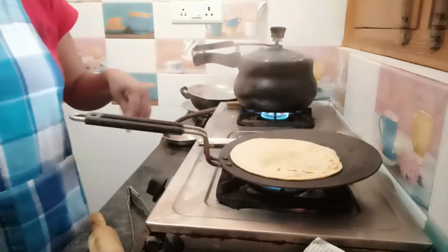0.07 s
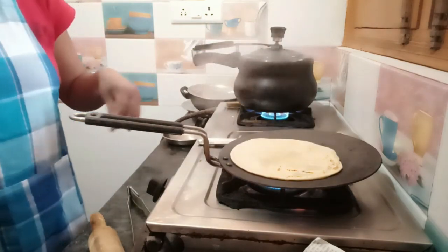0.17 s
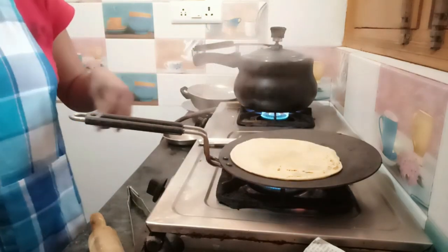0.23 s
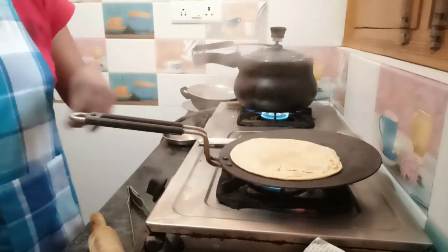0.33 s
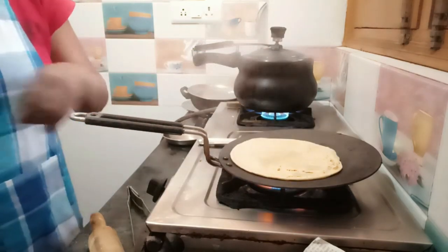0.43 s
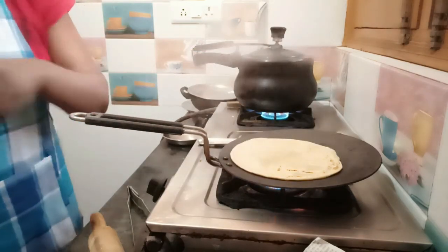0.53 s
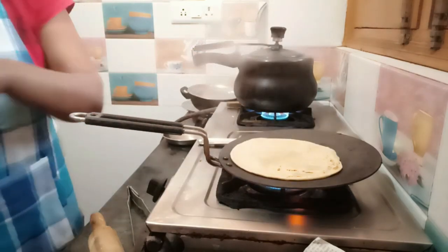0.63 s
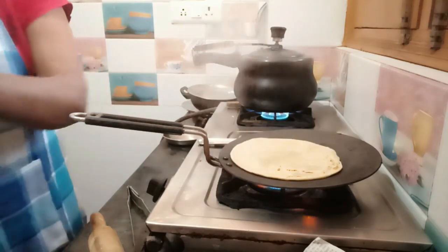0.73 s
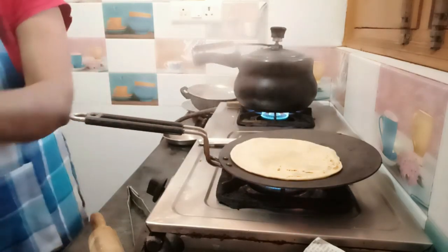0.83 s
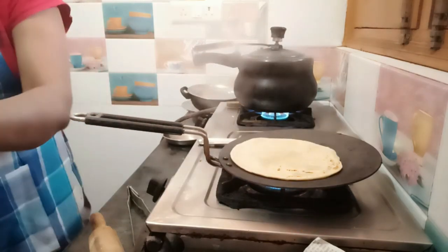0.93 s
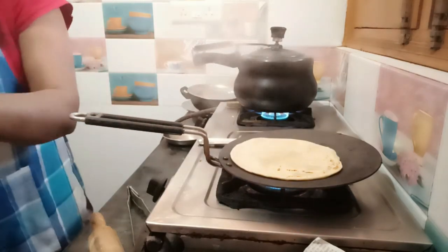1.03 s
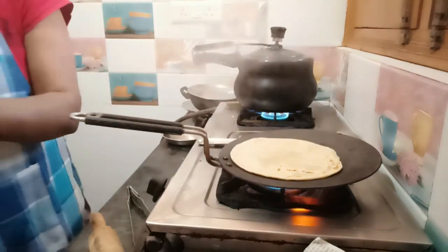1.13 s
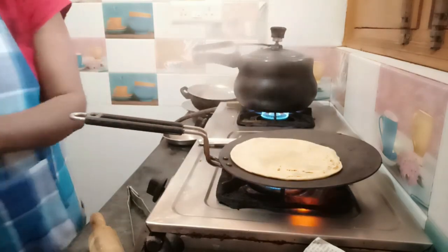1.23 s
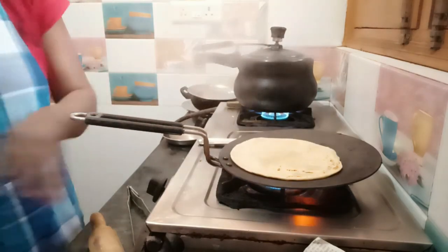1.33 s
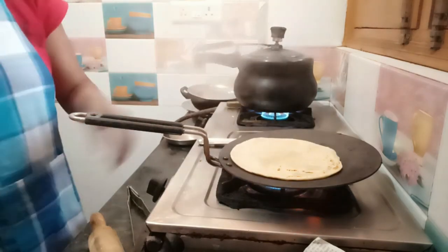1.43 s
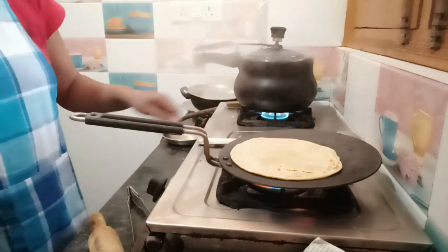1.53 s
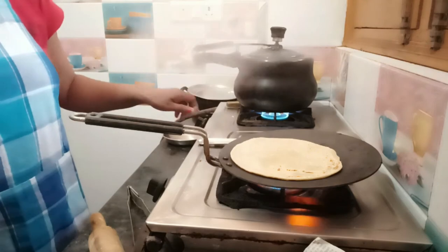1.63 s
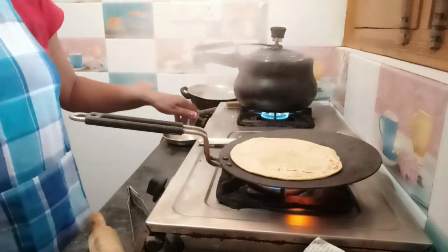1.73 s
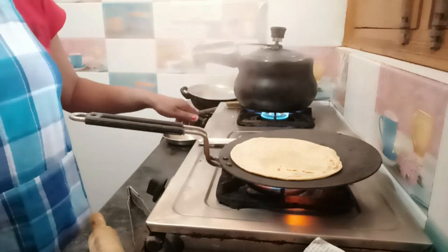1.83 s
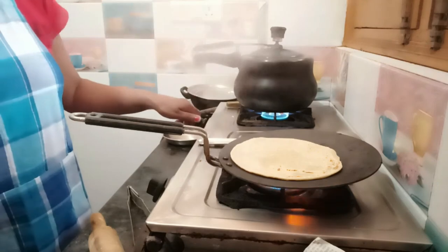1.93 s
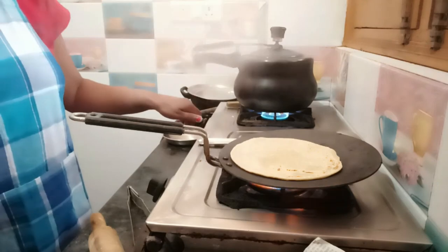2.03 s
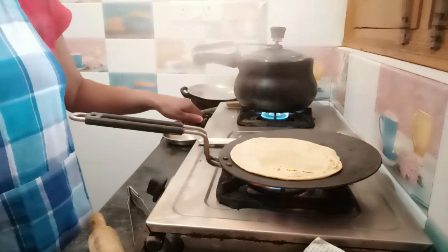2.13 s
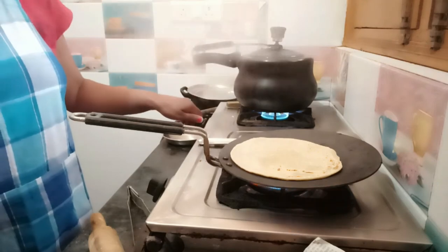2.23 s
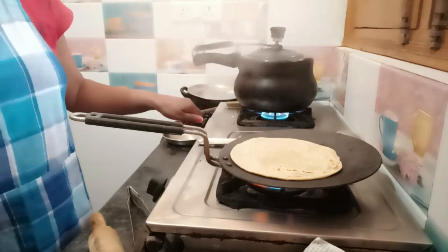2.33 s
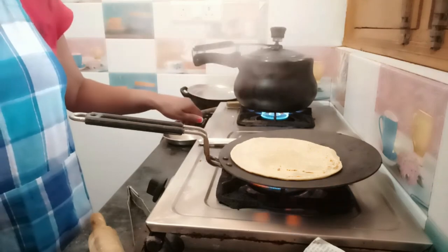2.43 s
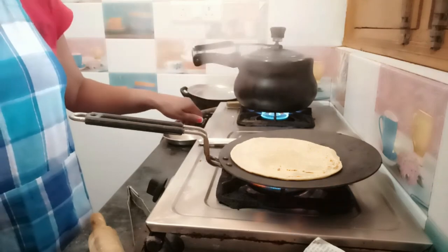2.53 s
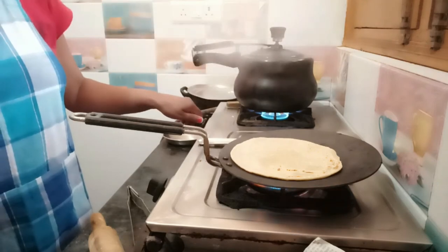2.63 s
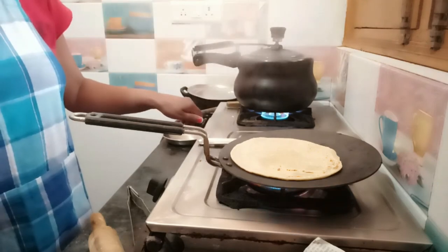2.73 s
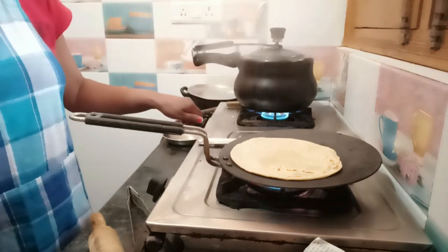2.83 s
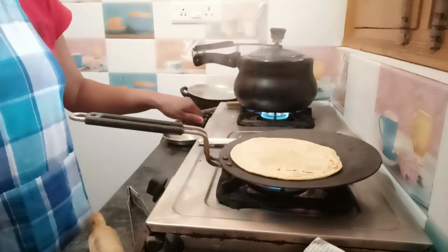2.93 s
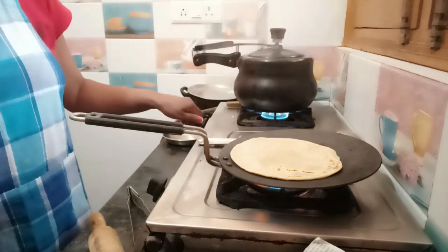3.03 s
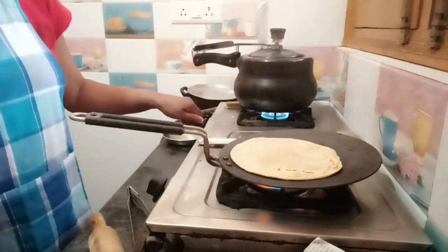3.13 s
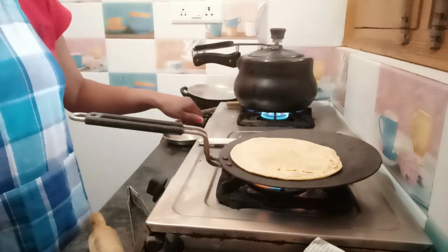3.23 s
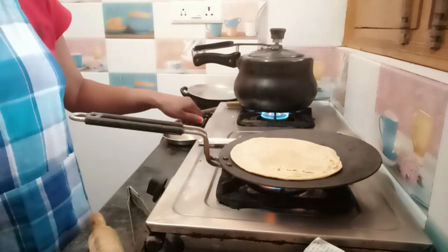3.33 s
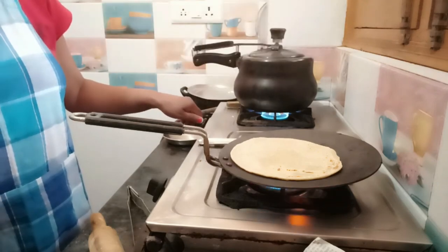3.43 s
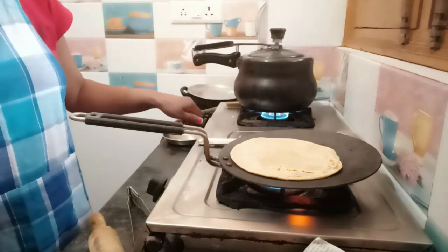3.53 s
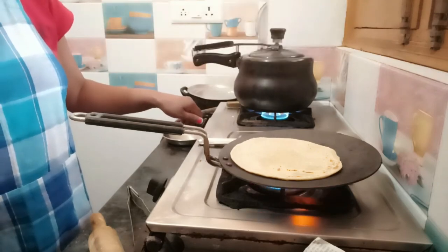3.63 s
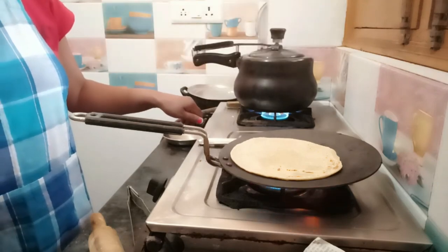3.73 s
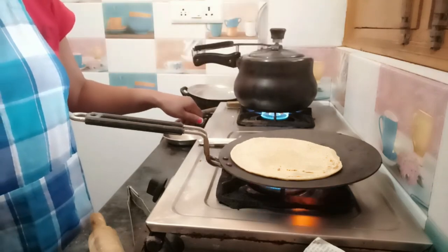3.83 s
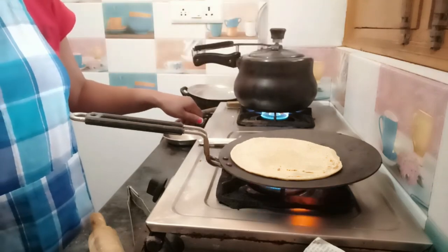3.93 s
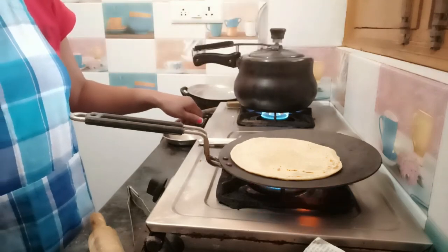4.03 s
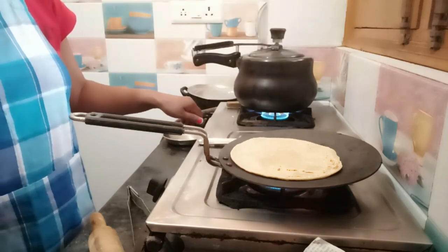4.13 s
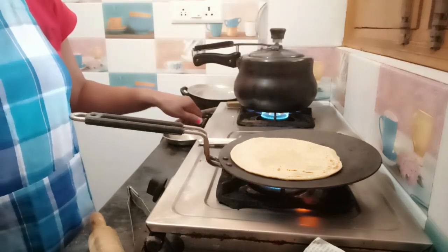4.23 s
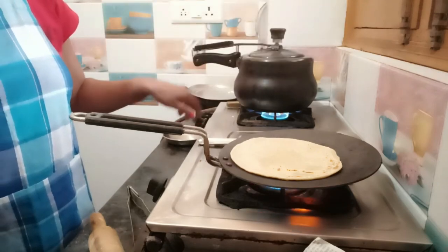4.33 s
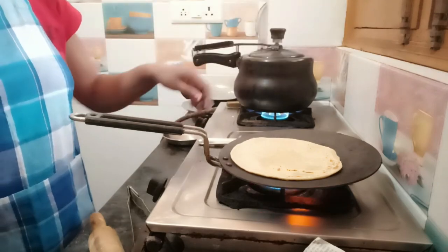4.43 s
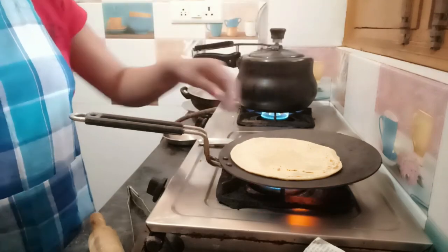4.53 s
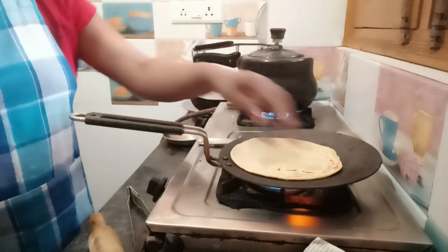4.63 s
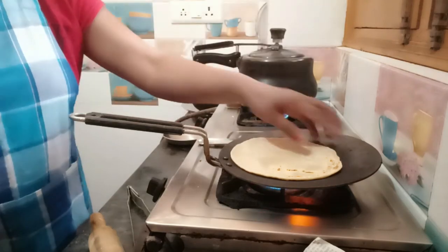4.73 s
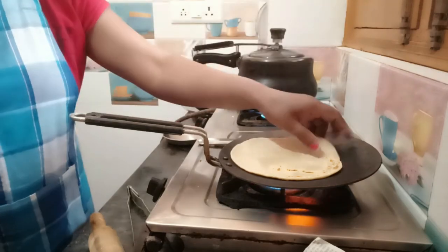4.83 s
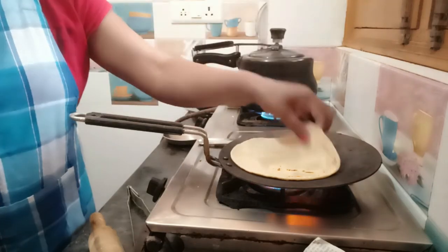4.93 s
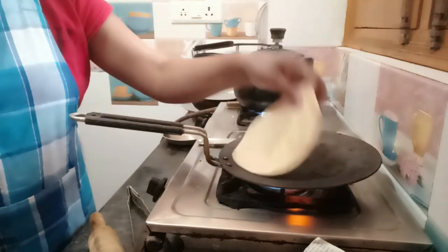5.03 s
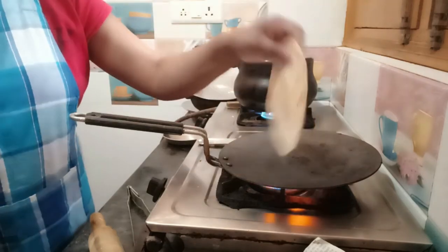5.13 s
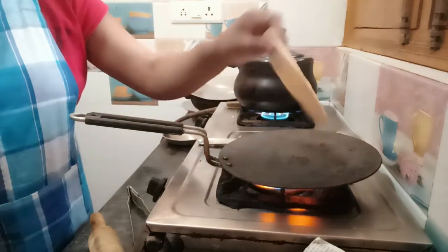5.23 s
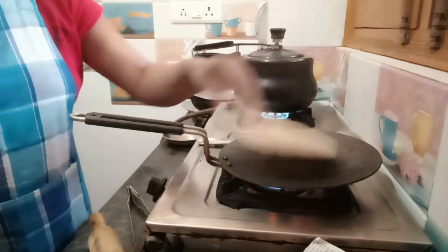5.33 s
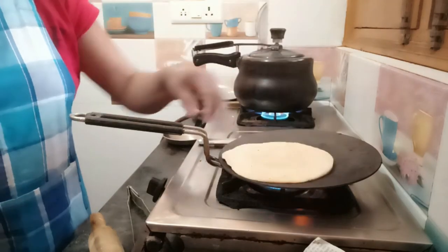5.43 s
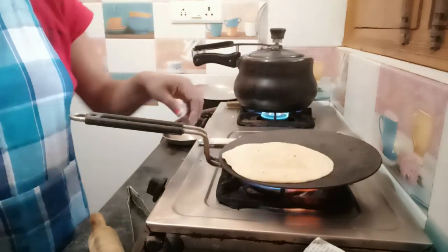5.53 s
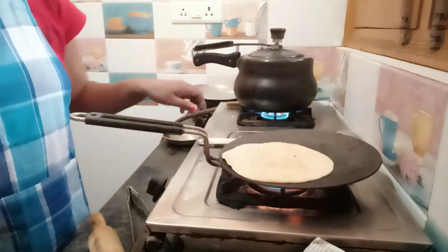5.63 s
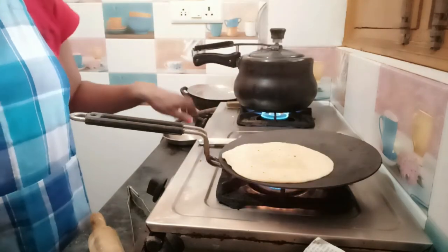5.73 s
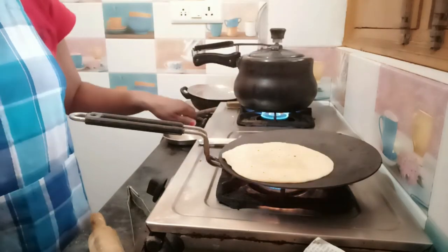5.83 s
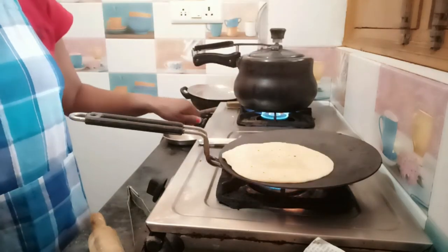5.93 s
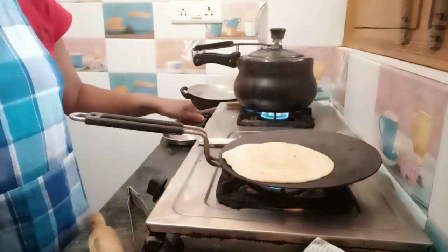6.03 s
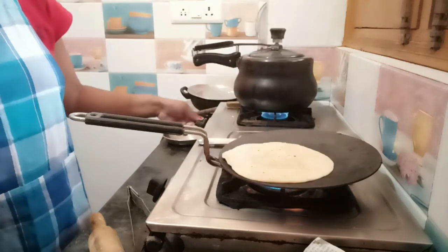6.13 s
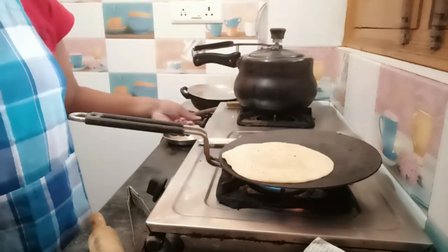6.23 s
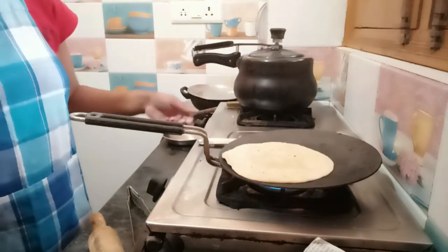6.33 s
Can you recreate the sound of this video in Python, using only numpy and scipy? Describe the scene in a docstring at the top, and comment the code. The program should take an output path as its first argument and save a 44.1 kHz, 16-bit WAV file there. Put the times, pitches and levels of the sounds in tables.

```python
"""Small tiled kitchen, phone close by: a pressure cooker blows off steam; a low rush of short blobs warbles
beneath, and soft thumps reach the phone. The weight drops back on the vent and jolts the sheet-steel stove.
The phone's gain creeps up again and reveals a thin leak and the gas flames. A flatbread is turned by hand
and slaps onto its griddle, then a burner knob is turned off, scraping and knocking on the stove.
Steam and flames are coloured noise, the stove a set of struck modes, the room a dense noise echo."""
import sys
import numpy as np
from scipy import signal
from scipy.fft import rfft, irfft, next_fast_len
from scipy.io import wavfile
from scipy.ndimage import uniform_filter1d

SR = 44100
rng = np.random.default_rng(int(sys.argv[2]) if len(sys.argv) > 2 else 0)


def master_out(mix):
    """Clip the mix to full scale and print it as 16-bit PCM to the path in sys.argv[1]."""
    frames = np.transpose(np.atleast_2d(mix))
    ceiling = np.clip(frames, -1, 1)
    pcm = np.round(ceiling * 32767).astype(np.int16)
    wavfile.write(sys.argv[1], SR, pcm)


N = 280917
T = np.arange(N) / SR
KITCHEN_T60_S, KITCHEN_BASS_T60_S = 0.12, 0.37
# the weight drops back on the vent
SEAT_S = 2.7675

# the flatbread lands edge first and unrolls onto the griddle, one row per patch of dough:
# t/s, peak level/dB, contact/s, thud/dB, middle/dB, clang/dB, click/dB
DOUGH_PATCHES = [(5.319, -31, 0.0024, -2, 4, 5, 8), (5.328, -20, 0.0027, -3, -13, -14, -2),
                 (5.347, -21, 0.0057, 21, -2, -9, -6), (5.364, -32, 0.0047, 7, -9, -6, -2),
                 (5.403, -22.5, 0.0037, 17, -1, -12, -24), (5.432, -44.5, 0.0057, 13, -4, -13, -22),
                 (5.474, -35, 0.0068, -4, -8, -16, -24)]


def undb(db):
    """Decibels to gain."""
    return 10 ** (np.asarray(db) / 20)


def unit(x):
    """Scale to rms 1."""
    return x / np.sqrt(np.mean(x ** 2))


def shape(points, hz):
    """Gain at the given frequencies from (Hz, dB) points."""
    f, db = np.transpose(points)
    return undb(np.interp(np.log(hz + 1), np.log(f), db))


def filtered(x, gain):
    """Apply a gain that is a function of frequency."""
    size = next_fast_len(x.shape[-1] + 2048, True)
    spectrum = rfft(x, size) * gain(np.fft.rfftfreq(size, 1 / SR))
    return irfft(spectrum, size)[..., :x.shape[-1]]


def noise(points, size=N):
    """Noise with the colour of (Hz, dB) points, rms 1."""
    white = rng.standard_normal(size)
    return unit(filtered(white, lambda hz: shape(points, hz)))


def walk(rate, size=N):
    """Random wander of rms 1 in straight lines between knots, rate knots per second."""
    knots = rng.standard_normal(int(T[size - 1] * rate) + 3)
    return unit(np.interp(T[:size] * rate + rng.random(), np.arange(len(knots)), knots))


def fade(t, t60):
    """Exponential decay, 60 dB down at t60."""
    return np.exp(-np.log(1000) * t / t60)


def swaying(x, centres, depths_db, rate, flicker):
    """Each band wanders in level, slowly and with a share of quicker flicker on top."""
    out = 0
    for depth, own in zip(depths_db, np.eye(len(centres))):
        band = filtered(x, lambda hz: np.interp(hz, centres, own))
        wander = walk(rate) + flicker * walk(3 * rate)
        out = out + band * undb(depth * wander)
    return out


def kitchen(x, wet_db, treble_db, t60, apart_hz):
    """Direct sound plus the tiles' dense echo, which is alike at both ports only in the bass."""
    t = T[:SR // 2]
    mid, side = rng.standard_normal((2, len(t))) * fade(t, t60) * (t > .002)
    side = filtered(side, lambda hz: hz / np.hypot(hz, apart_hz))
    echo = np.array([mid + side, mid - side])
    wet = lambda hz: shape([(5500, wet_db), (8000, wet_db + treble_db)], hz)
    response = filtered(echo / np.sqrt(np.sum(echo ** 2) / 2), wet)
    # the direct sound
    response[:, 0] += 1
    # the echo adds no overall level
    response = filtered(response, lambda hz: 1 / np.hypot(1, wet(hz)))
    # steady sounds have already filled the room when the scene opens
    running = np.pad(x, (len(t), 0), "reflect")
    return signal.fftconvolve(running[None], response)[:, len(t):len(t) + N]


def vent():
    """Steam bursts from the holes of the lifted weight, rings the vent and flutters as the weight dances."""
    # colour of the jet's hiss: f/Hz, level/dB per Hz
    jet_colour = [(1000, -77), (1250, -27.5), (1480, -21), (1950, -12), (2490, -11.5), (2720, -4),
                  (3390, -4), (3950, -1.5), (4990, -4.5), (6730, -2), (8780, -2), (9690, -15),
                  (10700, -1.5), (11700, -3.5), (14700, 4.5), (15400, -2.5)]
    # whistling resonances of the vent and its weight: f/Hz, width/Hz, lift/dB
    whistles = [(2998, 40, 4), (3504, 35, 4), (3845, 50, 4), (4268, 35, 4), (5513, 45, 5), (6730, 55, 5),
                (6996, 40, 4), (7751, 90, 3), (12880, 150, 3)]
    # the jet swells as the weight lifts, and is choked when the weight drops back
    jet_db, swell_db_per_s, choke_db_per_s = -2, 0.5, 238
    swell_db = swell_db_per_s * np.minimum(T, SEAT_S)
    choke_db = choke_db_per_s * np.maximum(T - SEAT_S, 0)
    flow = undb(jet_db + swell_db - choke_db)
    hiss = steam(jet_colour, flow, count=5, wet_db=15.0, treble_db=-12.5, sway_db=1.6, spit_db=.5)
    lift = lambda hz: undb(sum(db / (1 + (2 * (hz - f) / width) ** 2) for f, width, db in whistles))
    flutter = undb(0.42 * walk(35.05))
    return filtered(hiss, lift) * flutter


def steam(colour, flow, count, wet_db, treble_db, sway_db, spit_db):
    """Turbulent jets, each with its own tile echo; the treble sways most and droplets make them spit."""
    jets = sum(kitchen(noise(colour) * flow, wet_db, treble_db, KITCHEN_T60_S, apart_hz=700)
               for _ in range(count))
    centres = np.linspace(2000, 15000, 6)
    # the rocking weight swings the treble past the phone
    depths_db = sway_db * centres / centres[-1]
    hiss = swaying(jets / np.sqrt(count), centres, depths_db, rate=26, flicker=1.0)
    return hiss * undb(spit_db * walk(250))


def warble():
    """A low warbling rush under the hiss: short blobs of random pitch, outlasting the hiss a little."""
    # colour of the rush: f/Hz, level/dB per Hz
    rush_colour = [(110, -20), (170, -3), (230, 0), (330, -5), (430, -2), (530, 1.5), (620, -2), (700, -7),
                   (810, -3), (900, -9), (1000, -13), (1200, -6), (1340, 3), (1450, -2)]
    rush_db, fall_db_per_s = -34, 113
    blobs_per_s, blob_s, low_bias = 210, .05, 1.3  # a bias above 1 favours low pitches
    t = T[:int(blob_s * SR)]
    out, swell = np.zeros(N + len(t)), np.hanning(len(t))
    count = int(blobs_per_s * T[-1])
    lowest_hz, highest_hz = rush_colour[0][0], rush_colour[-1][0]
    for k, (late, pitch, size, phase) in enumerate(rng.random((count, 4))):
        hz = lowest_hz + pitch ** low_bias * (highest_hz - lowest_hz)
        start = int((k + late) / count * N)
        blob = swell * np.sin(2 * np.pi * (hz * t + phase))
        out[start:start + len(t)] += (1 + size) * blob
    rush = unit(filtered(out[len(t):], lambda hz: shape(rush_colour, hz)))
    rush = rush * undb(rush_db - fall_db_per_s * np.maximum(T - SEAT_S, 0))
    return kitchen(rush, wet_db=3, treble_db=5, t60=0.033, apart_hz=149)


def flop():
    """The flatbread slaps down patch by patch; the soft dough damps the griddle."""
    ring_share = 0.55  # of the modes' free ring time
    rows = [(*row, ring_share) for row in DOUGH_PATCHES]
    return blows(rows, sharp_s=0.0029, click_t60=0.27, snap_db=9)


def knocks():
    """The seating weight, the hand and the burner knob jolt the stove."""
    # thud, middle and clang weigh the stove's low, middle and high modes; ring is a multiple of the
    # modes' own ring time, less where the hand damps them:
    # t/s, peak level/dB, contact/s, thud/dB, middle/dB, clang/dB, click/dB, ring/ratio
    jolts = [(2.812, -25.5, 0.027, -1, 5, 7, -1, 0.58), (2.943, -37, 0.004, -6, 0, 7, 9, .6),
             (4.261, -30, 0.005, -12, 2, 1, -14, .85), (4.295, -33, 0.003, -3, 4, -2, -24, .8),
             (4.703, -28, 0.026, 3, -5, -5.5, -11, 1.6), (4.765, -32, 0.013, -3, -14, -9, -28, 1.6),
             (5.714, -31, 0.0041, -5, -2.5, -3, -22, 1), (5.914, -30.5, 0.004, -14, 6, 4, -25, 0.61),
             (5.953, -30.5, 0.0028, -9, 3, 19, -11, 0.35), (6.07, -20, 0.0027, -31, -13, -7.5, -7.5, 0.57),
             (6.083, -29, 0.0023, -12, -6, 14, -5, 0.43), (6.112, -37, 0.0014, -16, -1, -3, -15, 0.61),
             (6.188, -21, 0.0032, -23, -1, -1.5, -10, 0.68), (6.216, -31, 0.0067, -20, 18, -11, -24, 0.72),
             (6.268, -42, 0.013, 11, 12, -13, -26, 1)]
    return blows(jolts, sharp_s=0.0056, click_t60=0.38, snap_db=-28.0)


def blows(rows, sharp_s, click_t60, snap_db):
    """Each blow pushes and chatters into the stove's modes, with a dry click; long contacts start softly."""
    # the dry click of a contact: f/Hz, level/dB per Hz
    click_colour = [(150, 2), (300, -11), (800, -9), (1050, -1), (1350, -2.5), (1800, -2.5), (2500, 7.5),
                    (3500, -2), (6000, -6.5), (15000, -8)]
    out, t = np.zeros(2 * N), T[:SR // 4]
    for s, db, contact, thud_db, middle_db, clang_db, click_db, ring_share in rows:
        force = rng.standard_normal(len(t)) * np.sqrt(t) * np.exp(-t / contact)
        force /= np.linalg.norm(force)
        force[0] += sharp_s / contact
        # the chatter spreads the push in time but feeds all modes alike
        force = irfft(np.exp(1j * np.angle(rfft(force, 2 * len(t)))))[:len(t)]
        ring = signal.fftconvolve(force, stove(thud_db, middle_db, clang_db, contact, ring_share))
        ring /= abs(ring).max()
        click = noise(click_colour, size=len(t)) * fade(t, click_t60)
        # the first touch snaps right up into the treble
        snap = rng.standard_normal(len(t)) * fade(t, 0.045)
        click = click + undb(snap_db) * snap
        ring[:len(t)] += undb(click_db) * click / abs(click).max()
        start = int(s * SR)
        out[start:start + len(ring)] += undb(db) * ring
    return out[:N]


def stove(thud_db, middle_db, clang_db, contact, ring_share, place_db=1.5, frame_db=-4, frame_t60=0.22):
    """Stove top and frame ring: heavy pushes bring out low modes, hard ones high; each spot favours its own."""
    # modes of the stove top with the griddle on it: f/Hz, level/dB, t60/s
    modes = [(92, -4, 0.59), (131, -4, 0.51), (227.2, 11.5, 0.49), (398.4, 4.5, 1), (476, 1, 0.17),
             (536, 7.5, 0.23), (596, 8, 0.4), (710, -18, 0.24), (806, -2, 0.33), (930, -22.5, 0.17),
             (1316, 5.5, 0.12), (2480, -40, 0.12)]
    # the crowd of heavily damped modes of the stove's frame and counter: f/Hz, level/dB per Hz
    frame_colour = [(70, 5), (140, 6.5), (230, 7), (330, 10.5), (480, -2), (600, 17), (700, -6), (800, 11),
                    (920, 4), (1030, -51), (1350, -26), (2400, -14), (5000, -60)]
    # a contact of the typical length dulls the highest modes by this much, a longer one more
    typical_contact_s, softening_db = 0.015, 8
    joggles_per_s, joggle_detune, joggle_db = 45, 0.011, 1.5
    t = T[:SR // 2 + SR // 4]
    dull_db = softening_db * contact / typical_contact_s
    spot = [(135, thud_db), (205, 0), (250, 0), (380, middle_db), (440, middle_db),
            (570, clang_db), (620, clang_db), (1240, clang_db - dull_db)]
    push = lambda hz: shape(spot, hz)
    hz, db, t60 = np.transpose(modes)[:, :, None]
    size = push(hz) * undb(db + place_db * rng.standard_normal(hz.shape))
    # the griddle joggles on its support, so each mode wavers in pitch and level as it rings
    joggle = lambda: np.array([walk(joggles_per_s, size=len(t)) for _ in modes])
    phase = 2 * np.pi * np.cumsum(hz * (1 + joggle_detune * joggle()), axis=1) / SR
    waver = undb(joggle_db * joggle())
    top = np.sum(size * waver * np.sin(phase) * fade(t, t60 * ring_share), axis=0)
    frame = filtered(noise(frame_colour, size=len(t)), push) * fade(t, frame_t60)
    # an open sheet radiates almost nothing below its lowest mode
    radiation = signal.butter(3, 90, "high", fs=SR, output="sos")
    return signal.sosfilt(radiation, unit(top) + undb(frame_db) * unit(frame))


def drag():
    """The knob's spindle sticks and slips: uneven catches rattle the stove, a chatter follows the turn."""
    # one stiff turn; its chatter is quickest in mid-turn
    turn_s, length_s, attack_s, release_t60_s = 5.865, 0.12, 0.04, 0.23
    rattle_db, chatter_db, slow_hz, fast_hz = -41, -41, 187, 313
    t = T - turn_s
    grip = np.clip(t / attack_s, 0, 1) * fade(np.maximum(t - length_s, 0), release_t60_s)
    speed = np.sin(np.pi * np.clip(t / length_s, 0, 1))
    # about 500 catches per second
    catches = (rng.random(N) < 500 / SR) * rng.standard_normal(N)
    # the hand on the knob damps the ring a little
    ring = stove(thud_db=-20, middle_db=-1, clang_db=22, contact=0, ring_share=0.96,
                 frame_db=-2, frame_t60=0.044)
    rattle = signal.fftconvolve(unit(catches) * grip, ring / np.linalg.norm(ring))[:N]
    hz = (slow_hz + (fast_hz - slow_hz) * speed) * (1 + 0.0777 * walk(200))
    chatter = unit(np.sin(2 * np.pi * np.cumsum(hz) / SR) * undb(5.4 * walk(120)))
    return undb(rattle_db) * rattle + undb(chatter_db) * chatter * np.sqrt(grip)


def scratch():
    """A finger rasps along the knob as it turns: fine catches with the dry colour of a click."""
    # colour of the rasp: f/Hz, level/dB per Hz
    rasp_colour = [(900, -25), (1300, 2), (1700, 1), (2050, 2), (2700, -9), (5000, -14), (12000, -30)]
    start_s, length_s, rasp_db, catches_per_s = 5.888, 0.15, -50.5, 800
    along = np.clip((T - start_s) / length_s, 0, 1)
    catches = (rng.random(N) < catches_per_s / SR) * rng.standard_normal(N)
    rasp = unit(filtered(catches, lambda hz: shape(rasp_colour, hz)))
    return undb(rasp_db) * rasp * np.sin(np.pi * along)


def bumps(rows):
    """Dull thuds at the phone: a few dying swings with a rumble, panned between the ports."""
    # colour of the rumble: f/Hz, level/dB per Hz
    rumble_colour = [(20, 2), (110, 5), (250, -9), (500, 2), (700, -32), (1200, -41)]
    attack_s, rumble_db = 0.0017, 2.5
    out, t = np.zeros((2, N)), T[:SR // 4]
    for s, db, t60, hz, pan_db in rows:
        rumble = undb(rumble_db) * noise(rumble_colour, size=len(t))
        swing = np.sin(2 * np.pi * hz * t) + rumble
        thump = swing * fade(t, t60) * (1 - np.exp(-t / attack_s))
        start = int(s * SR)
        side_gains = undb(db + np.array([[pan_db], [-pan_db]]) / 2)
        out[:, start:start + len(t)] += side_gains * thump / abs(thump).max()
    # the lowest bass is cut
    return filtered(out, lambda hz: np.minimum(hz / 25, 1) ** 2)


def leak():
    """Thin threads of steam escape round the seated weight; their treble reaches the phone directly."""
    # colour of the leak: f/Hz, level/dB per Hz
    leak_colour = [(650, -61), (1100, -20.5), (1270, -14), (1370, -12), (1520, -15), (2490, -11),
                   (2810, -7.5), (3790, -1), (4780, -8.5), (6300, -1.5), (7500, -1.5), (8120, 3),
                   (8870, 0.5), (9790, -12), (10600, -4.5), (12500, -2), (14400, 3.5), (15400, -0.5)]
    return steam(leak_colour, undb(-35.5), count=3, wet_db=26.5, treble_db=-31.5, sway_db=2.0, spit_db=0.37)


def flames():
    """The burners' low flutter: noise of wandering level, nearly the same at both ports."""
    # colour of the gas flames: f/Hz, level/dB per Hz
    flame_colour = [(25, -6), (70, -19), (100, -6.5), (133, -2), (173, -10), (228, 6), (275, -6), (400, -5),
                    (500, -5), (590, -11), (900, -16.5), (1020, -43)]
    roar = noise(flame_colour) * undb(1.6 * walk(4.5))
    return undb(-53.0) * kitchen(roar, wet_db=1, treble_db=-2.0, t60=KITCHEN_BASS_T60_S, apart_hz=374)


def scene():
    """Cooker, low warble, flames and the work at the griddle; thumps and a puff of air at the phone."""
    # soft thumps of air and handling at the phone:
    # t/s, level/dB (peak, mean of the two sides), t60/s, f/Hz, left minus right/dB
    thumps = [(.376, -24, 0.087, 45, -29), (.382, -32, .06, 420, -16), (.405, -30, 0.13, 105, -30),
              (.718, -30, 0.1, 87, 28), (.772, -30, 0.12, 400, 15), (.812, -34, 0.2, 54.7, 18),
              (.886, -33, 0.087, 74.5, 22)]
    # the air that the flatbread pushes aside reaches the phone as a puff, same columns
    puff = (DOUGH_PATCHES[0][0], -28, 0.4, 87, 0)
    work = kitchen(knocks() + flop() + drag() + scratch(), wet_db=-3.0, treble_db=0.5,
                   t60=KITCHEN_BASS_T60_S, apart_hz=352)
    air = bumps(thumps) + bumps([puff])
    return vent() + warble() + leak() + flames() + air + work


def gain_control(x, limit_db, attack_s, release_s):
    """Turn down whatever exceeds the limit, and let the gain creep back afterwards."""
    hop = SR // 100
    power = uniform_filter1d(np.mean(x ** 2, axis=0), 2 * hop)[::hop]
    excess = np.maximum(10 * np.log10(np.maximum(power, 1e-12)) - limit_db, 0)
    # the gain has already settled when the scene opens
    cut = [excess[:20].mean()]
    for over in excess[1:]:
        lag = attack_s if over > cut[-1] else release_s
        cut.append(cut[-1] + (over - cut[-1]) * (1 - np.exp(-hop / SR / lag)))
    return x * undb(-np.interp(T, T[::hop], cut))


def record(dry):
    """Each microphone port has its own colour; the phone rides its gain and cuts the top."""
    # the two microphone ports: f/Hz, left minus right/dB
    port_colour = [(150, 1), (450, 2), (1400, 3), (2950, -2), (3600, 3), (4100, -1), (5500, 0.5),
                   (6400, -5), (8500, -4), (9700, 0), (10700, 4.5), (12000, 1.5), (14000, 1.5), (14900, -2)]
    top_hz = 15520
    sides = np.array([[1], [-1]]) / 2
    heard = filtered(dry, lambda hz: shape(port_colour, hz) ** sides)
    heard = gain_control(heard, limit_db=-15.0, attack_s=1.0, release_s=0.71)
    return filtered(heard, lambda hz: np.clip((top_hz - hz) / 80 + .5, 0, 1))


dry = scene()
out = record(dry)
master_out(out)
```